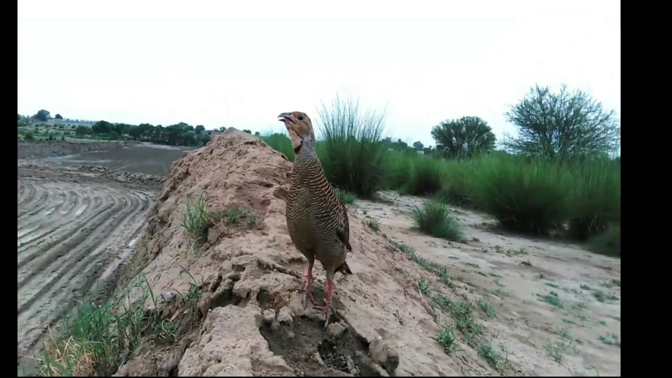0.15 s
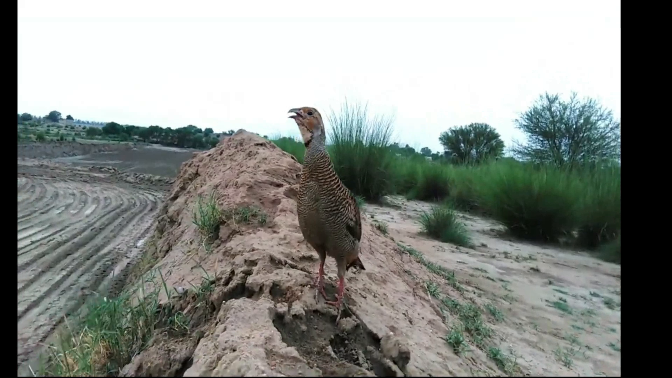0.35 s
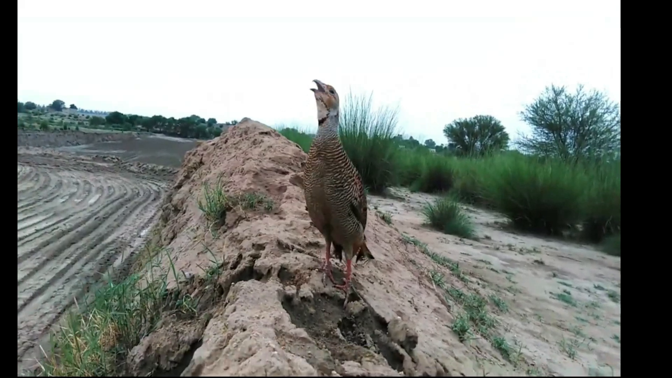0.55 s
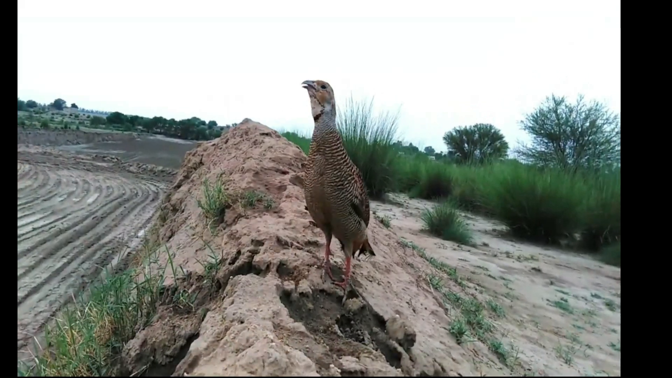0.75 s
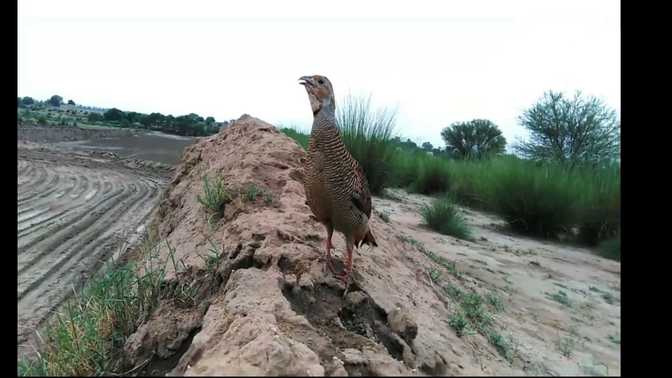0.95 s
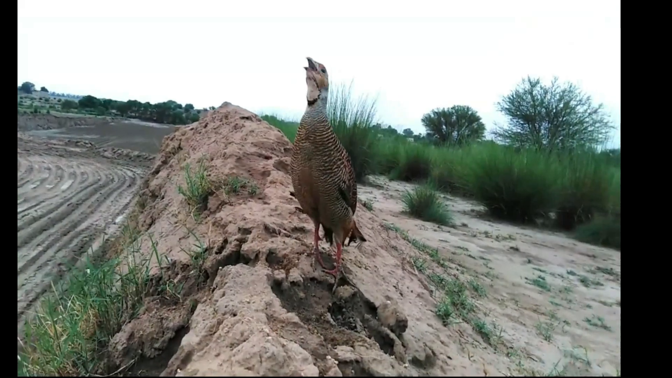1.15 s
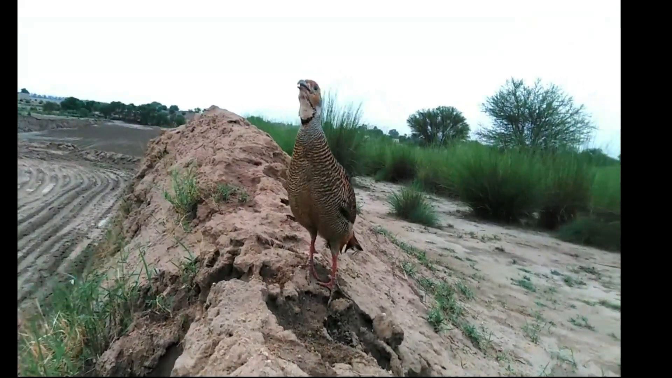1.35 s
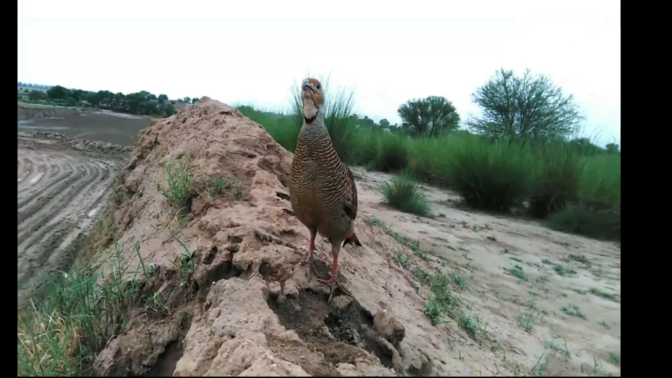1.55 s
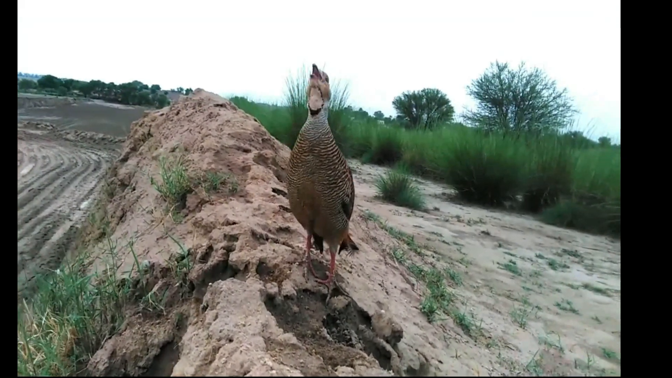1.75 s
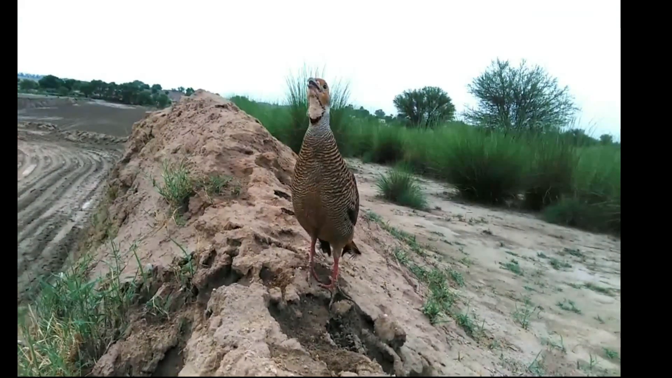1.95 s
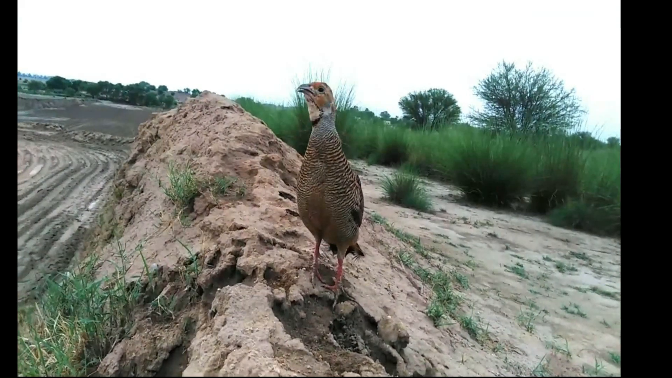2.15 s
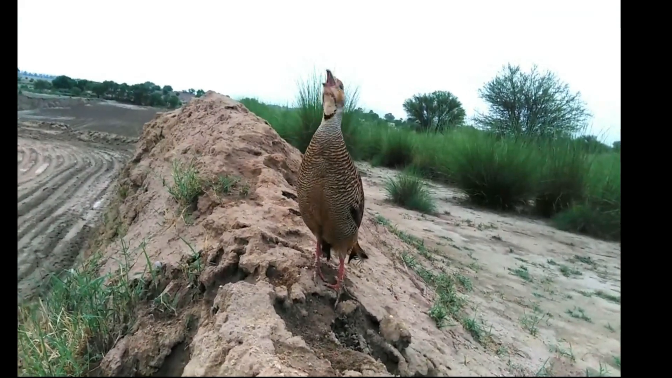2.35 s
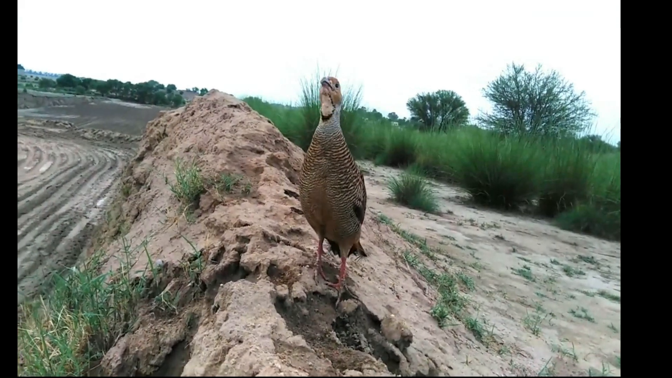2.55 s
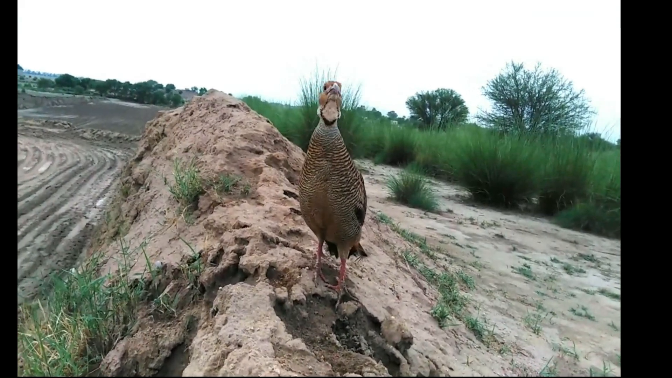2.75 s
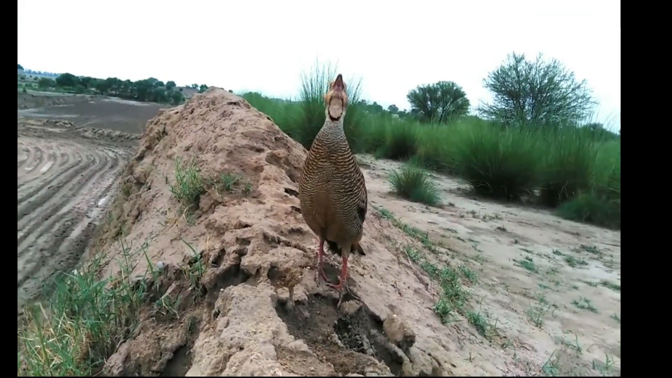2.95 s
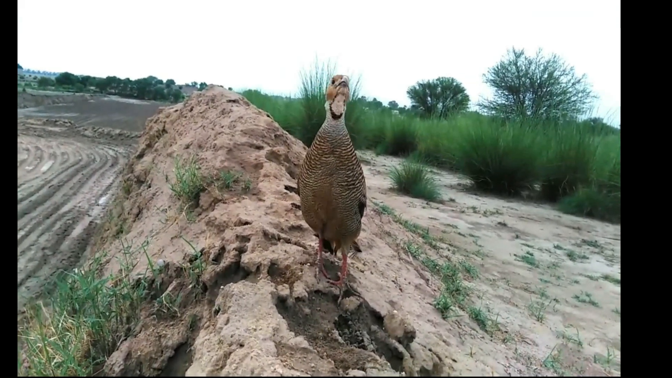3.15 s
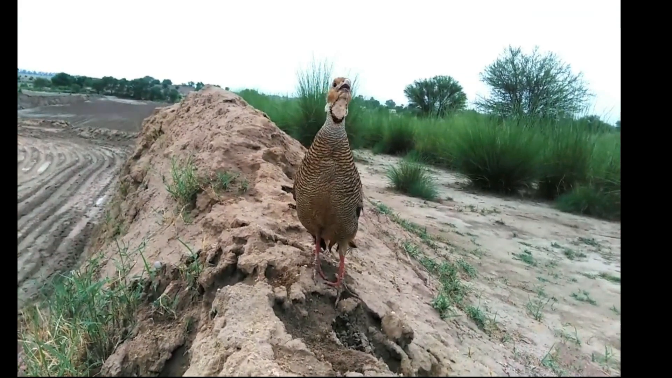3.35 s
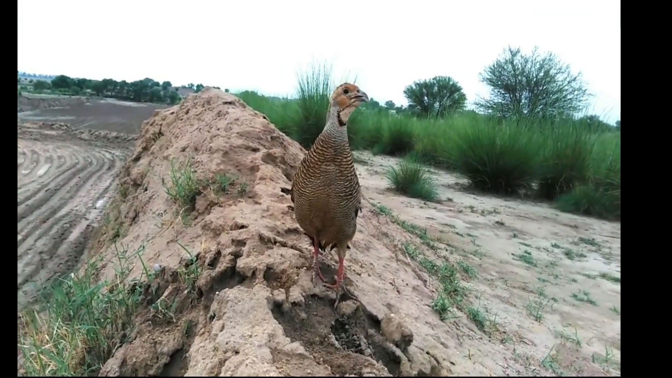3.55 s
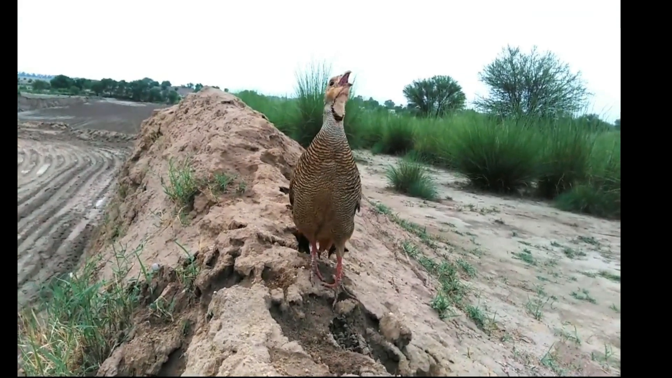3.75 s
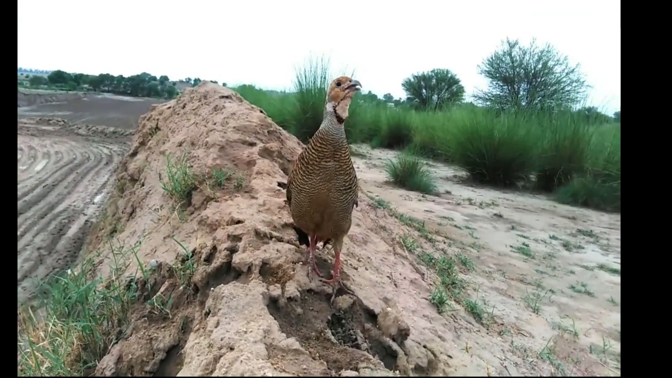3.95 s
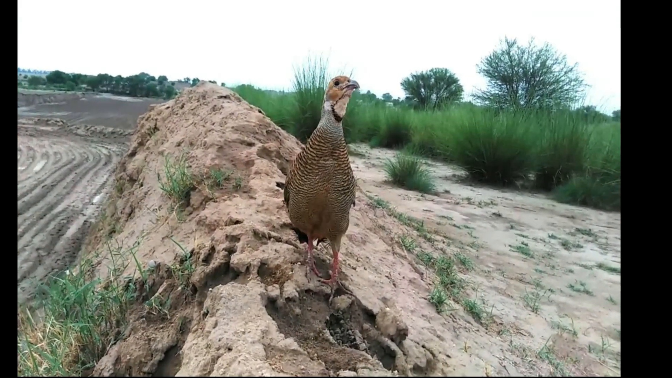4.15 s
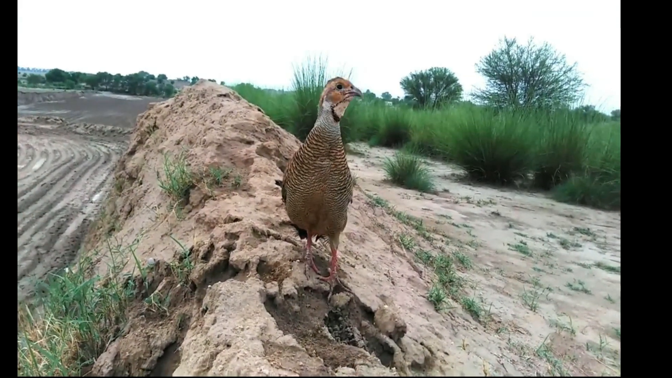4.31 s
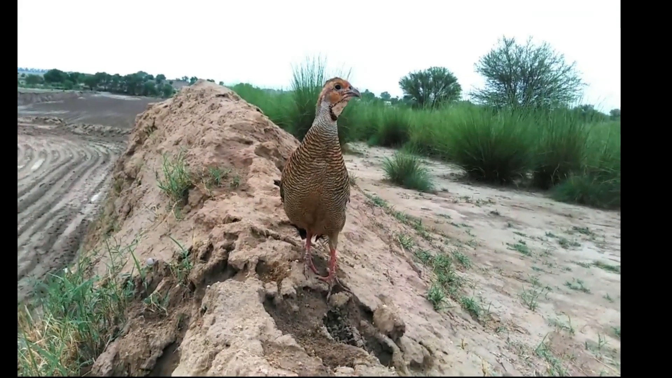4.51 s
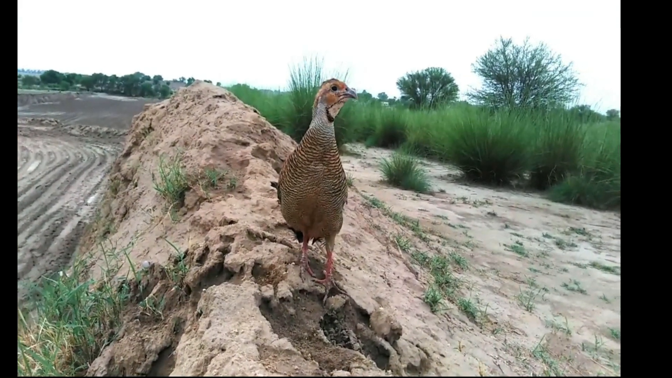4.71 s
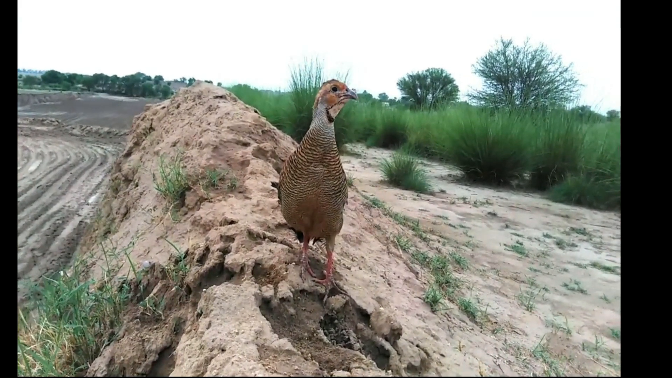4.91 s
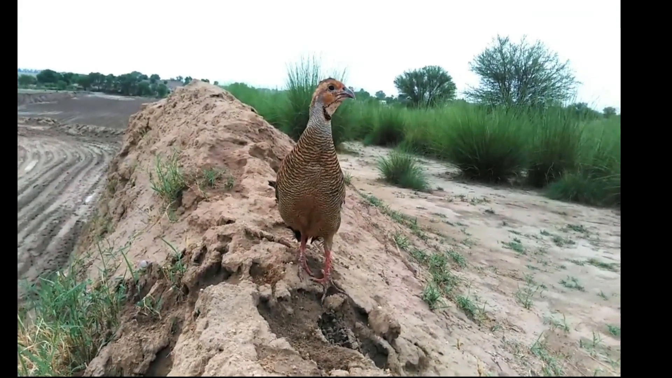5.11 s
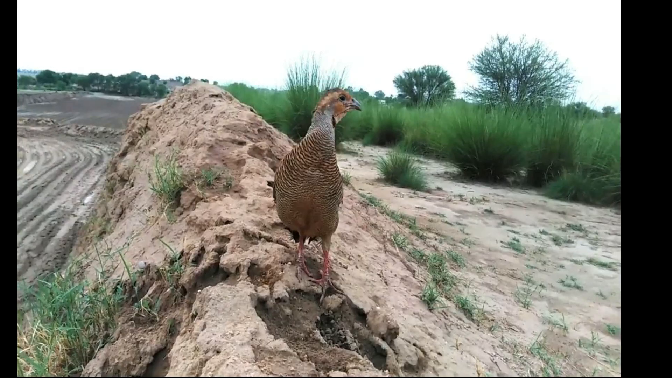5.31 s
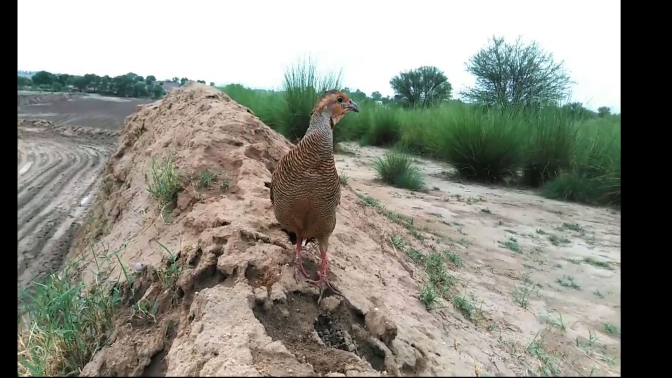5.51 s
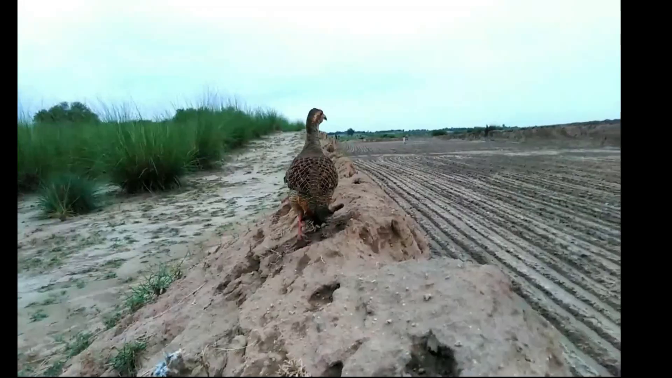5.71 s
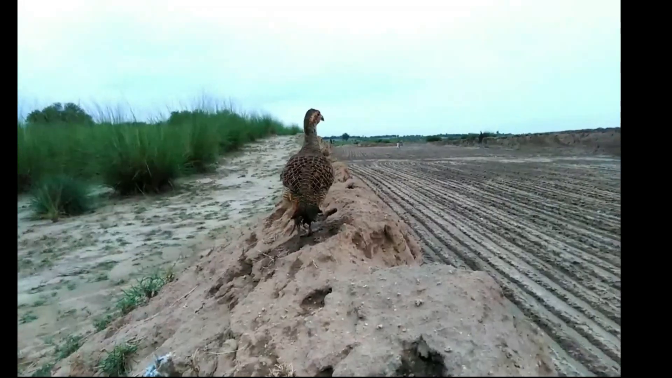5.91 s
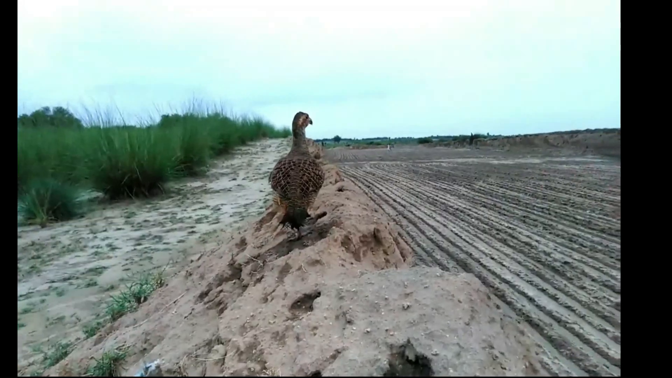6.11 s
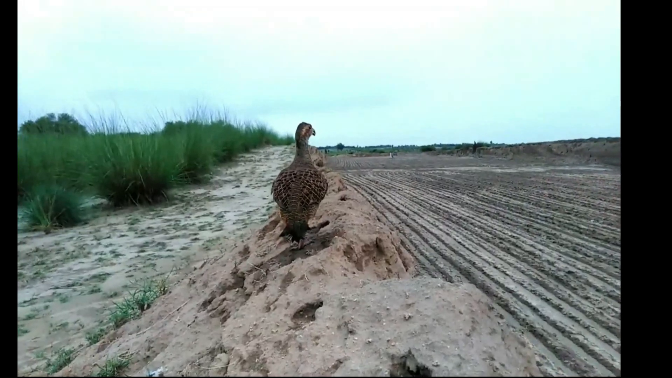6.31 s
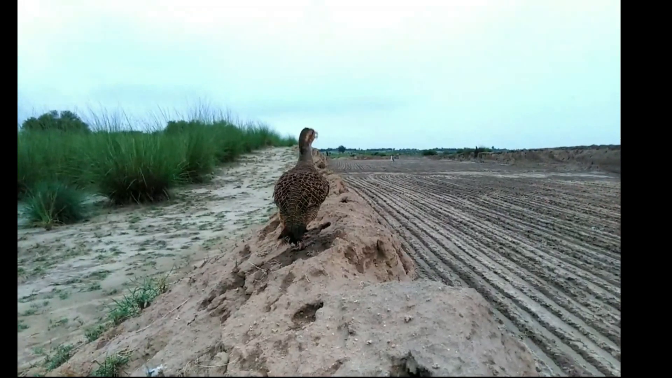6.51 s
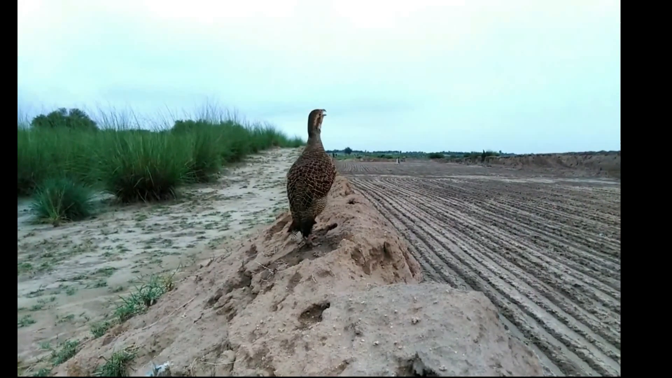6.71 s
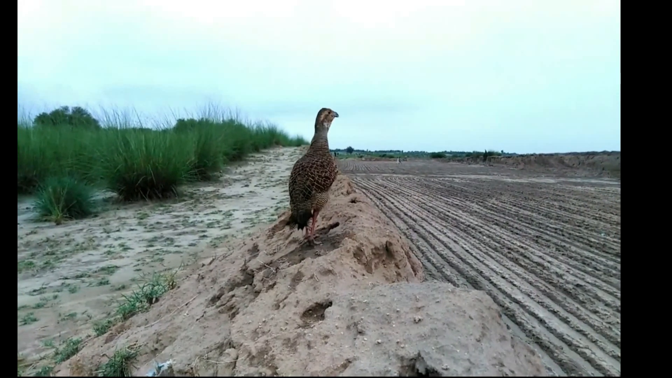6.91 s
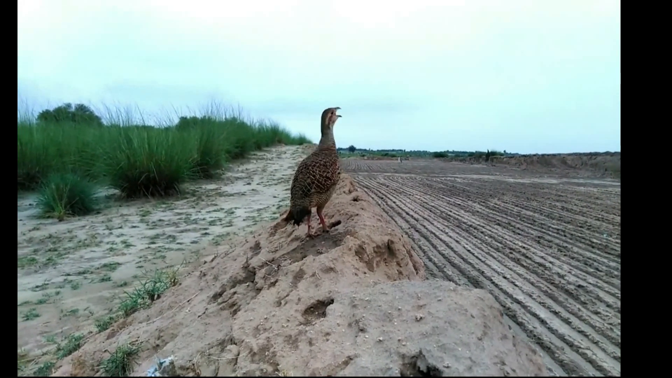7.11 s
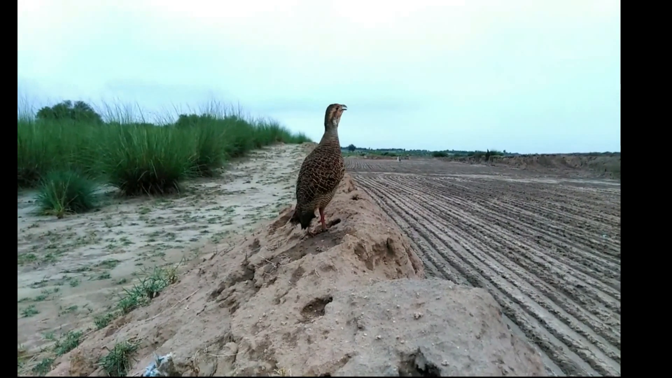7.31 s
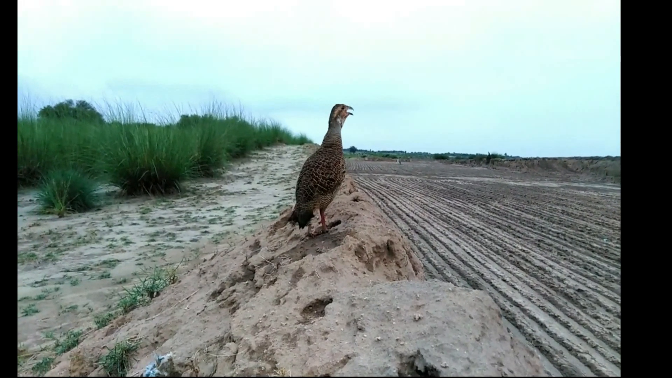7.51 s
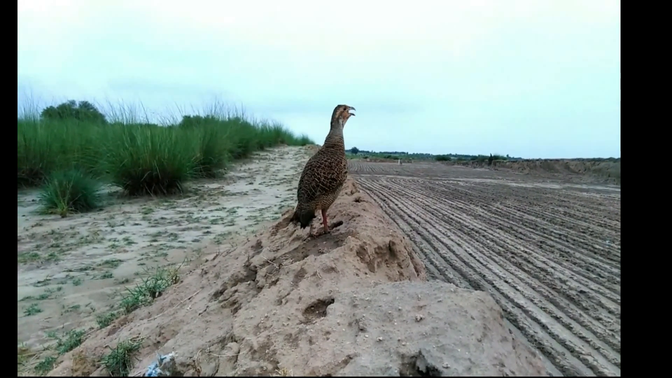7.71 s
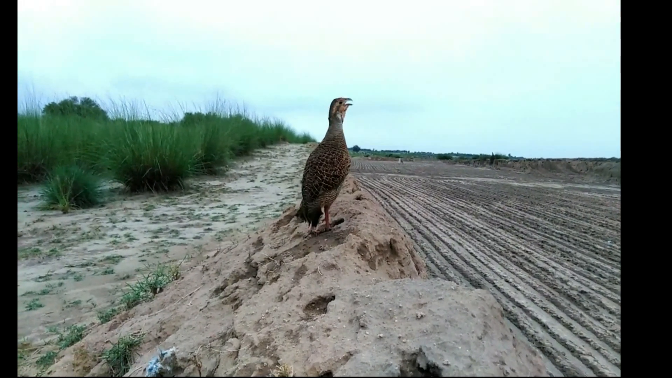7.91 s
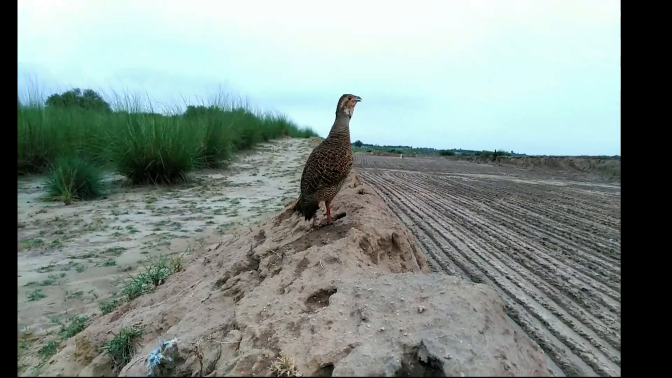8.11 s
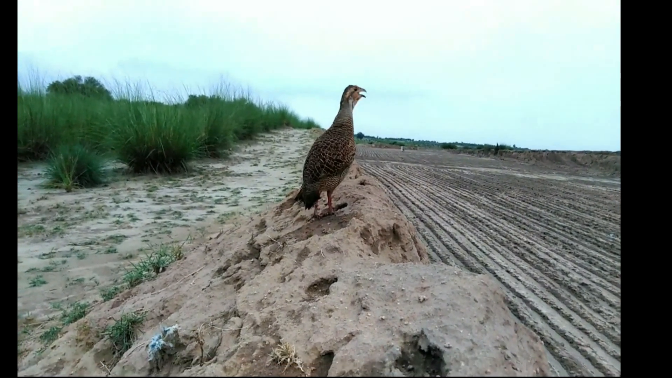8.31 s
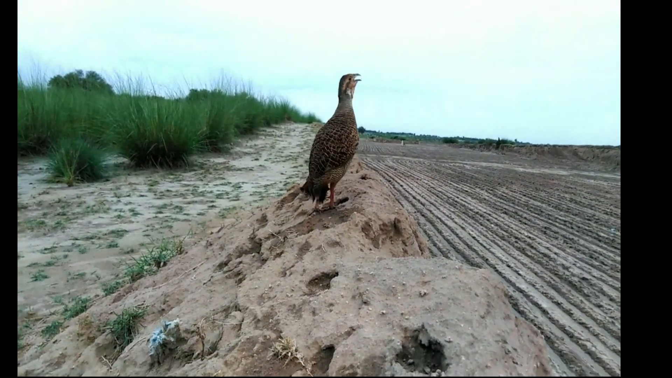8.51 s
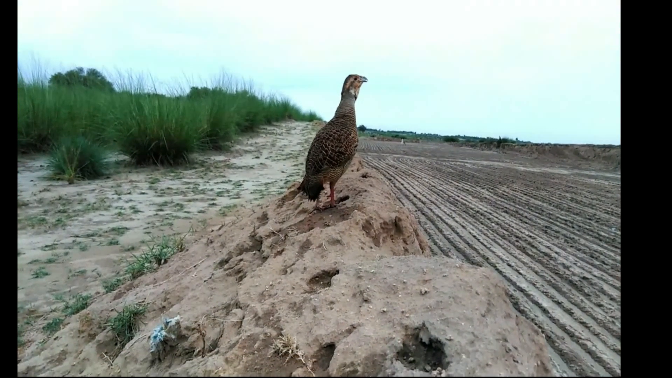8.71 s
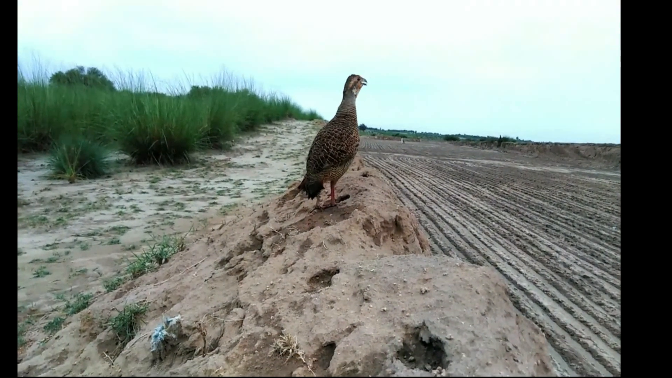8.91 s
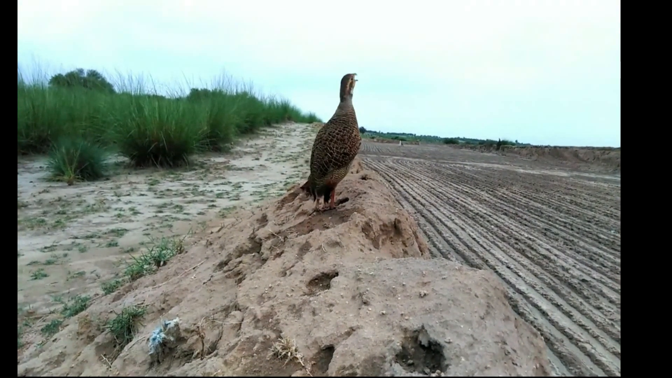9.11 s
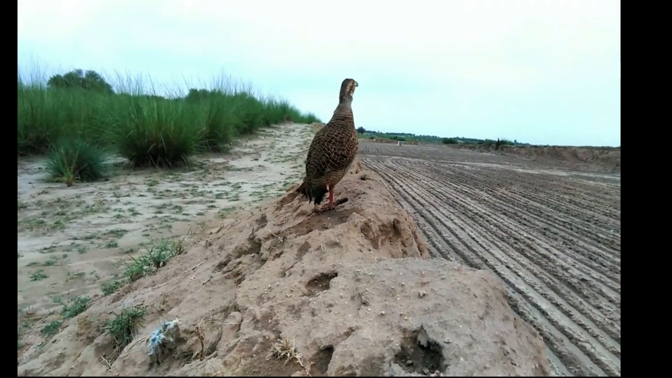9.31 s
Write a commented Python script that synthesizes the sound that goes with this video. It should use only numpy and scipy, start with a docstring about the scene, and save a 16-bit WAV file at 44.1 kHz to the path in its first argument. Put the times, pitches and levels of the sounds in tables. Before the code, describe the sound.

Outdoors over a soft low rumble, a game bird shrieks in a fast, regular run: cluck-cluck, airy whistle, raspy screech sliding down. The calls are loud, bright and almost overloaded, with brief scattered reflections. A pause leaves distant chips and twitter, then a click; after a short wait the same calling builds up again, slightly quieter and more distant, through to the end.

```python
"""A grey francolin screeches close to the microphone over a low rumble; after a sharp click it sounds further off.
Phrases are two clucks, a thin hissy whistle and a loud screech that breaks, catches and slides down.
Voice: harmonics of a pitch jumping between registers, roughened by noise; whistle: near-pure tone in hiss.
An earth bank and bushes return short scattered echoes; small birds, swept sines, are heard in the pause.
The loudest notes run into a limiter."""
import sys
import numpy as np
from scipy import signal
from scipy.fft import rfft, irfft
from scipy.io import wavfile
from scipy.ndimage import uniform_filter1d, minimum_filter1d

SR = 44100
rng = np.random.default_rng(int(sys.argv[2]) if len(sys.argv) > 2 else 0)


def persist_wave(psi):
    """Save psi, clipped to +-1, as 16-bit WAV."""
    counts = np.round(np.clip(psi, -1, 1) * 32767).astype(np.int16)
    wavfile.write(sys.argv[1], SR, np.atleast_2d(counts).T)


N = 412776
TIME = np.arange(N) / SR
CLICK_S = 5.72  # a sharp click; from here on the bird sounds further off
NEAR_LAG_SAMPLES = 3  # before the click the left port hears the bird later


def undb(db):
    """Decibels to gain."""
    return 10 ** (np.asarray(db) / 20)


def unit(x):
    """Scale to rms 1."""
    return x / np.sqrt(np.mean(x ** 2))


def follow(t, rows):
    """Columns of a curve, joined by straight lines, at times t."""
    s, *columns = np.transpose(rows)
    return [np.interp(t, s, column) for column in columns]


def colour(x, points):
    """Minimum-phase filter with the gain of (Hz, dB) points, joined over log frequency."""
    hz, db = np.transpose(points)
    size = 8192
    grid_hz = np.maximum(np.fft.rfftfreq(size, 1 / SR), 1)
    gain = undb(np.interp(np.log(grid_hz), np.log(hz), db))
    # folding the cepstrum makes the response causal
    cepstrum = irfft(np.log(gain))
    cepstrum[1:size // 2] *= 2
    cepstrum[size // 2 + 1:] = 0
    response = irfft(np.exp(rfft(cepstrum)))[:size // 2]
    return signal.oaconvolve(x, response)[:len(x)]


def noise(points):
    """Coloured noise of rms 1."""
    return unit(colour(rng.standard_normal(N), points))


def waver(hz):
    """Random motion of rms 1, low-passed at hz."""
    lowpass = signal.butter(2, hz, fs=SR, output="sos")
    return unit(signal.sosfilt(lowpass, rng.standard_normal(N)))


def turn(hz):
    """Phase of an oscillator of moving pitch."""
    return 2 * np.pi * np.cumsum(hz) / SR


def perform(notes, fade_s):
    """Lay notes with rows (s, Hz, dB, ..) on the time axis as pitch, gain, ..; both ends fade exponentially."""
    out = np.zeros((len(notes[0][0]) - 1, N))
    for rows in notes:
        start_s, end_s = rows[0][0], rows[-1][0]
        span = np.arange(*np.searchsorted(TIME, [start_s - 10 * fade_s, end_s + 10 * fade_s]))
        t = TIME[span]
        note = np.array(follow(t, rows))
        outside_s = np.abs(t - np.clip(t, start_s, end_s))
        note[1] = undb(note[1]) * np.exp(-outside_s / fade_s)
        # one throat sings one note at a time: the louder one takes over
        out[:, span] = np.where(note[1] > out[1, span], note, out[:, span])
    return out


def register(length_s, from_hz, to_hz, collapse, db, swell_db, rough_from, rough_to):
    """Rows (s, Hz, dB, roughness): scoop, glide, collapse; as pressure fails, level falls and chaos grows."""
    scoop, scoop_s = .12, .002  # share of pitch below at first, time constant
    collapse_power = 5.5  # the higher, the later the pressure gives way
    db_per_octave, rough_per_collapse = 12, 1.93
    u = np.linspace(0, 1, 32, endpoint=False)
    lost = collapse * u ** collapse_power
    glide_hz = from_hz + (to_hz - from_hz) * u
    hz = glide_hz * (1 - lost) * (1 - scoop * np.exp(-length_s * u / scoop_s))
    level_db = db + swell_db * u + db_per_octave * np.log2(hz / from_hz)
    rough = rough_from + (rough_to - rough_from) * u + rough_per_collapse * lost
    return np.column_stack([length_s * u, hz, level_db, rough])


def gesture(registers):
    """One note: syrinx registers end to end, swelling in at the start."""
    onset_db, onset_s = -5, 0.0027
    starts_s = np.cumsum([0] + [row[0] for row in registers])
    rows = np.vstack([register(*row) + [s, 0, 0, 0] for s, row in zip(starts_s, registers)])
    rows[:, 2] += onset_db * np.exp(-rows[:, 0] / onset_s)
    return rows


def syrinx(notes, harmonics_db, jitter, shimmer, rasp_db):
    """A membrane between clean and chaotic vibration; rough cycles tear the air once a turn."""
    # Air torn by the syrinx. Each row: frequency in Hz, relative gain in dB.
    rasp_colour = [(250, -17.5), (650, -16), (1000, -4), (3000, 6), (8000, -7.5), (8900, -21),
                   (12400, -11.5), (14500, -28)]
    hz, gain, rough = perform(notes, fade_s=.0022)
    rough = np.clip(rough, 0, 1)
    phase = turn(hz * (1 + jitter * rough * waver(hz=664.5)))
    # the harder the bird pushes, the brighter the note
    effort = (gain / gain.max()) ** 0.34
    tone = 0
    for k, db in enumerate(harmonics_db, 1):
        tone = tone + undb(db) * np.sin(k * phase) * effort ** np.log2(k)
    # in rough stretches a slower flutter of the membrane adds side tones
    swing = shimmer * rough
    flutter = (waver(hz=440) + np.sqrt(2) * np.sin(.19 * phase)) / np.sqrt(2)
    tone = tone * (1 + swing * flutter) / np.sqrt(1 + swing ** 2)
    pulses = 1 + .6 * np.cos(phase)
    rasp = noise(rasp_colour) * pulses * (rough + .12) * effort * undb(rasp_db)
    return gain * (np.sqrt(2) * tone + rasp)


def screeches():
    """One gesture of chained registers each time, varied in length, pitch and level."""
    # Registers of a screech. Each row: length in s, nominal glide from Hz, to Hz, share of pitch lost in
    # the collapse, relative level in dB, swell in dB, base roughness 0-1 at first, at last.
    registers = [(.022, 1860, 1880, .06, -6, 1, .8, .2), (.023, 2980, 2620, .15, -5, 1.5, .85, .55),
                 (.033, 2540, 2560, .29, 3.5, 2, .12, .04), (.02, 2830, 2880, .26, -6.5, 2, .75, .55),
                 (.064, 2520, 2020, .4, 2, -3.5, .05, .03)]
    # Each row: start in s, length ratio, pitch ratio, relative level in dB.
    calls = [(-0.058, 0.96, 0.99, -7), (0.543, 0.96, 1.012, -7.5), (1.149, 0.97, 1.003, -6.5),
             (1.766, 1, 1, -6), (2.414, 1.012, 0.99, -6.5), (3.056, 1.022, 0.98, -7), (3.734, 1, 0.97, -7),
             (6.73, 0.91, 0.8, -10.5), (7.288, 0.91, 0.995, -8), (7.895, 0.96, 1.005, -8),
             (8.501, 0.99, 1, -8), (9.122, 1.003, 1, -9)]
    # Harmonic strengths, lowest first, in dB at full effort.
    harmonics_db = [-0.5, -5.5, -10.5, -14.5, -14.5, -28.5]
    shape = gesture(registers)
    notes = [shape * [length, pitch, 1, 1] + [s, 0, db, 0] for s, length, pitch, db in calls]
    return undb(-0.45) * syrinx(notes, harmonics_db, jitter=.12, shimmer=.8, rasp_db=-2.0)


def to_ports(voice, path, lag_samples):
    """Beam and ground colour the voice differently at each port; the left may lag."""
    path = np.array(path)
    left, right = colour(voice, path[:, [0, 1]]), colour(voice, path[:, [0, 2]])
    return np.array([np.roll(left, lag_samples), right])


def beak_to_microphone(voice):
    """Direct sound: one colouring per port up to the click, another, further-sounding, after it."""
    # Near path, before the click. Each row: frequency in Hz, left gain in dB, right gain in dB.
    near_path = [(1010, -3.5, -0.5), (2060, -9.5, 4), (2560, 4.5, 6), (3077, 2, 1.5), (4430, 2, 5.5),
                 (4670, 1, 12.5), (4900, 0.5, 8.5), (5200, 2, 4.5), (5568, 12, 11), (7520, 4, 10),
                 (9980, -5.5, 2), (10900, -23.5, 4), (11400, 1, 8.5)]
    # Further path, after the click. Each row: frequency in Hz, left gain in dB, right gain in dB.
    far_path = [(1120, -6, -5), (1730, -11, -3.5), (2670, -1.5, 2.5), (3210, -9, -7), (4180, 6.5, 2),
                (5310, 12, 10), (5850, 4.5, -4), (9503, -12.5, -3.5), (10297, -7.5, -1), (12400, 2, -3.5)]
    near = TIME < CLICK_S
    return to_ports(voice * near, near_path, NEAR_LAG_SAMPLES) + to_ports(voice * ~near, far_path, 0)


def scatter(x, delay_s, t60_s):
    """Many small reflections that build up and die away, unrelated at the two ports."""
    t = TIME[:SR // 2]
    shape = (1 - np.exp(-(t / delay_s) ** 2)) * np.exp(-np.log(1000) * t / t60_s)
    response = rng.standard_normal((2, len(t))) * shape / np.sqrt(np.sum(shape ** 2))
    return signal.fftconvolve(np.atleast_2d(x), response, axes=1)[:, :N]


def bank_echo(bird):
    """As the head turns, the voice strikes other clods: two scatter patterns exchange slowly."""
    heading = 2 * np.pi * 0.4485 * TIME
    clods = [scatter(bird, delay_s=0.0016, t60_s=0.043) for _ in range(2)]
    return undb(-4.5) * (np.cos(heading) * clods[0] + np.sin(heading) * clods[1])


def bush_echo(calls):
    """Bushes throw the calls back coloured, scattered and quieter on the right."""
    # Reflection of the bushes. Each row: frequency in Hz, relative gain in dB.
    reflection = [(1500, -1), (2500, -0.5), (3500, 1), (4700, 14.5), (6200, 7), (7500, 0), (14000, -6.5)]
    thrown = colour(calls, reflection) * undb(np.where(TIME < CLICK_S, 0, -4))
    return undb([[-23], [-30]]) * scatter(thrown, delay_s=0.019, t60_s=0.42)


def rumble():
    """Low outdoor noise, partly shared by the ports; it dips briefly just before the click."""
    # Spectrum. Each row: frequency in Hz, relative gain in dB.
    spectrum = [(25, -15.5), (50, -8.5), (72, -1.5), (120, -6.5), (230, -22), (450, -42), (2000, -54),
                (14000, -63.5)]
    # Each row: time in s, level in dB.
    level_points = [(0, -51), (4.5, -54.5), (5.59, -54), (5.62, -75.5), (5.71, -76), (5.73, -55),
                    (9.3, -48.5)]
    db, = follow(TIME, level_points)
    shared = noise(spectrum)
    return undb(db) * unit(shared + np.array([noise(spectrum), noise(spectrum)]))


def clucks():
    """A dull low register, then a brighter, cleaner one; weak notes are hoarser and bend less in pitch."""
    # Registers of a cluck. Each row: length in s, nominal glide from Hz, to Hz, share of pitch lost in
    # the collapse, relative level in dB, swell in dB, base roughness 0-1 at first, at last.
    registers = [(.034, 1410, 1600, .03, -4, 4, .85, .1), (.029, 2090, 1940, .35, -1.5, -3, .12, .08)]
    # Each row: start in s, pitch ratio, relative level in dB, extra level of the upper register in dB.
    calls = [(0.217, 1.04, -8, -2), (0.336, 0.96, -10, -5.5), (0.817, 1.05, -8.5, -0.5),
             (0.937, 1.005, -8.5, -6), (1.427, 1.036, -8, 0), (1.549, 0.95, -8, -2.5),
             (2.049, 1.063, -8, 0), (2.174, 0.97, -8.5, -5), (2.693, 1.013, -8, -0.5),
             (2.818, 0.92, -10.5, -4.5), (3.333, 0.99, -8, -0.5), (3.457, 0.88, -9.5, -5),
             (3.58, .76, -28, -15), (4.006, 0.96, -9, -0.5), (4.128, 0.83, -11, -5), (4.256, 0.76, -19, -3),
             (6.53, .8, -29, -5), (6.992, 0.8, -15.5, -0.5), (7.094, 0.76, -20, -2.5),
             (7.558, 1.034, -7.5, -1.5), (7.676, 0.91, -10.5, -2), (8.176, 1.066, -6.5, -2),
             (8.294, 0.98, -8.5, -2), (8.782, 1.06, -6.5, -1), (8.903, 0.98, -10, -1)]
    # Harmonic strengths of the lower register, lowest first, in dB at full effort.
    low_harmonics_db = [-1, -14, -21, -19.5, -25, -31.5]
    # Harmonic strengths of the upper register, lowest first, in dB at full effort.
    high_harmonics_db = [-0.5, -6.5, -11.5, -18, -18.5, -22.5]
    far_length, far_hoarse = .94, 1.25  # ratios after the click
    hoarse_below_db, hoarse_per_db = -9.5, 0.5
    t, hz, swell_db, rough = gesture(registers).T
    centre_hz = hz.mean()
    lows, highs = [], []
    for s, pitch, db, upper_db in calls:
        length, hoarse = (1, 1) if s < CLICK_S else (far_length, far_hoarse)
        hoarse += hoarse_per_db * max(hoarse_below_db - db, 0)
        bent_hz = pitch * centre_hz * (hz / centre_hz) ** (1 / hoarse)
        note = np.column_stack([s + length * t, bent_hz, db + swell_db, rough])
        low, high = np.split(note, 2)
        low[:, 3] = 1 - (1 - low[:, 3]) / hoarse
        lows.append(low)
        highs.append(high * [1, 1, 1, hoarse ** 2] + [0, 0, upper_db, 0])
    low_voice = undb(-0.5) * syrinx(lows, low_harmonics_db, jitter=.115, shimmer=0.65, rasp_db=-13.0)
    high_voice = syrinx(highs, high_harmonics_db, jitter=.11, shimmer=1.0, rasp_db=-14.0)
    return low_voice + high_voice


def whistle_note(s, length_s, from_hz, to_hz, db, pan_from_db, pan_to_db):
    """Rows (s, Hz, dB, left minus right dB): starts weak and flat, scoops in, then glides ever more slowly."""
    attack_s, attack_db, scoop_hz = 0.015, -9, 110.5
    bend = .85  # under 1, the glide levels off
    u = np.linspace(0, 1, 64)
    attack = np.exp(-length_s * u / attack_s)
    hz = from_hz + (to_hz - from_hz) * u ** bend - scoop_hz * attack
    pan_db = pan_from_db + (pan_to_db - pan_from_db) * u
    return np.column_stack([s + length_s * u, hz, db + attack_db * attack, pan_db])


def whistles():
    """A nearly pure tone in a jet of hiss; its narrow beam swings between the ports as the head turns."""
    # Each row: start in s, length in s, nominal glide from Hz, to Hz, relative level in dB,
    # left minus right in dB at first, at last.
    calls = [(0.368, 0.2, 3485, 3640, -8, 5.5, 5.8), (.99, 0.23, 3533, 3660, -6, 12.5, 10),
             (1.6, 0.17, 3510, 3800, -8, 14, 5.9), (2.234, .2, 3410, 3720, -9, 20, 3.5),
             (2.9, 0.19, 3430, 3660, -8.5, 16, 5), (3.555, 0.19, 3416, 3800, -9.5, 17, 1),
             (6.552, 0.25, 3426, 3560, -9, 14, 10.4), (7.102, .21, 3559, 3517, -7.5, 9, 9.6),
             (7.708, .2, 3393, 3510, -11.5, -6, 4.4), (8.345, .202, 3501, 3670, -9.5, 1, 15.7),
             (8.945, 0.22, 3430, 3660, -9.5, -6, 16.2)]
    # The whistle falters. Each row: centre in s, half width in s, depth in dB.
    falters = [(.53, .03, -5), (1.741, 0.037, -15.5), (3.705, .024, -7), (7.21, 0.036, -16),
               (7.818, 0.019, -6)]
    # Air hissing past the whistle. Each row: frequency in Hz, relative gain in dB.
    hiss_colour = [(700, -18), (1600, -11), (2700, -9), (3700, 1.5), (5800, -11.5), (7200, -9),
                   (10000, -19.5), (14000, -34)]
    hz, gain, pan_db = perform([whistle_note(*row) for row in calls], fade_s=0.0055)
    falter_db = sum(db * np.exp(-((TIME - s) / width_s) ** 2) for s, width_s, db in falters)
    gain = gain * undb(falter_db + 1.4 * waver(hz=24.57))
    phase = turn(hz * (1 + 0.0062 * waver(hz=250) + 0.0046 * waver(hz=12)))
    wave = np.sin(phase) + undb(-39.5) * np.sin(2 * phase)
    tone = np.sqrt(2) * gain * (1 + 0.13 * waver(hz=114)) * wave
    near = TIME < CLICK_S
    tone = np.array([np.where(near, np.roll(tone, NEAR_LAG_SAMPLES), tone), tone])
    ports = undb(np.array([pan_db, -pan_db]) / 2)
    ports /= np.sqrt(np.mean(ports ** 2, axis=0))
    # the air keeps flowing where the tone falters
    flow = gain / (gain + undb(-42.5))
    left_hiss = undb(np.where(near, -28, -20)) * noise(hiss_colour)
    right_hiss = undb(np.where(near, -33, -31)) * noise(hiss_colour)
    return tone * ports + flow * np.array([left_hiss, right_hiss])


def small_birds():
    """Falling chips, uneven runs of twitter and a trilled whistle, as sines blurred by distance."""
    # Falling chips. Each row: start in s, starting pitch in Hz, relative level in dB.
    chips = [(4.34, 5870, -68), (4.535, 6130, -65), (4.735, 6100, -65)]
    # Runs of twitter. Each row: from s, to s, mean relative level in dB.
    twitter = [(4.999, 5.52, -72.5), (5.77, 6.08, -64), (6.222, 6.48, -59)]
    # Distant trilled whistle. Each row: time in s, centre pitch in Hz, relative level in dB.
    trill = [(5.12, 2220, -63), (5.17, 2470, -66), (5.23, 2390, -65), (5.28, 1904, -76.5)]
    calls = list(chips)
    for start_s, end_s, db in twitter:
        for s in np.arange(start_s, end_s, .06):
            dt_s, dhz, ddb = rng.standard_normal(3) * [.012, 110, 2]
            calls.append((s + dt_s, 5700 + dhz, db + ddb))
    falls = [[(s, hz, db), (s + .05, hz * .92, db - 2)] for s, hz, db in calls]
    hz, gain = perform(falls, fade_s=.004)
    song = gain * np.sin(turn(hz))
    hz, gain = perform([trill], fade_s=0.00494)
    trilled_hz = hz * (1 + 0.047 * np.sin(2 * np.pi * 70 * TIME))
    song += undb(2.0) * gain * np.sin(turn(trilled_hz))
    return undb(-1.5) * (song + scatter(song, delay_s=0.015, t60_s=0.43))


def click():
    """One sharp single-sample tick inside a few milliseconds of fizz."""
    out = undb(-42.0) * rng.standard_normal(N) * np.exp(-np.abs(TIME - CLICK_S) / 0.0048)
    out[int(CLICK_S * SR)] -= undb(5.0)
    return out


def scene():
    """The francolin with its reflections from the bank and the bushes, and the field around it."""
    voice = screeches() + clucks()
    bird = beak_to_microphone(voice)
    whistle = whistles()
    echoes = bank_echo(bird) + bush_echo(voice + whistle.mean(axis=0))
    return bird + whistle + echoes + small_birds() + rumble() + click()


def record(dry):
    """A fast limiter holds each port's peaks; what it removes, rectified, grumbles in the bass; top is cut."""
    ceiling, hold_samples = .9, SR // 1000
    top_hz = 14400
    needed = ceiling / np.maximum(np.abs(dry), ceiling)
    limited = dry * uniform_filter1d(minimum_filter1d(needed, hold_samples), hold_samples)
    bass = signal.butter(2, [42, 160], "bandpass", fs=SR, output="sos")
    grumble = signal.sosfilt(bass, np.abs(dry - limited))
    top_cut = signal.ellip(8, .2, 80, top_hz, fs=SR, output="sos")
    return signal.sosfilt(top_cut, limited + undb([[-25], [-17]]) * grumble)


dry = scene()
out = record(dry)
persist_wave(out)
```